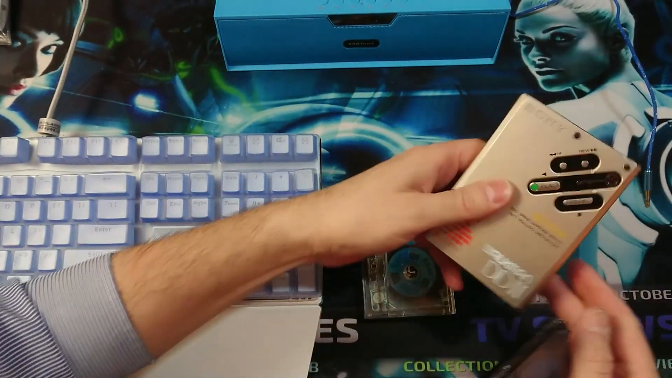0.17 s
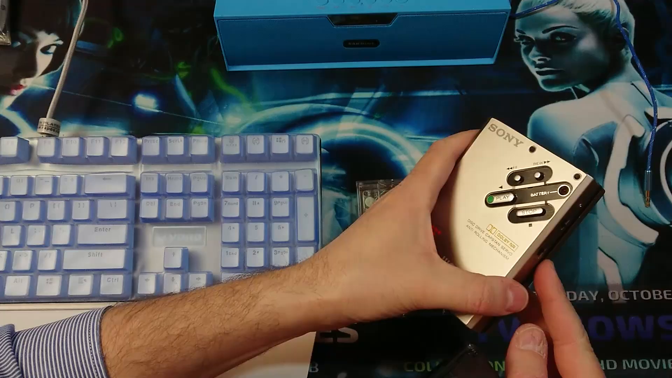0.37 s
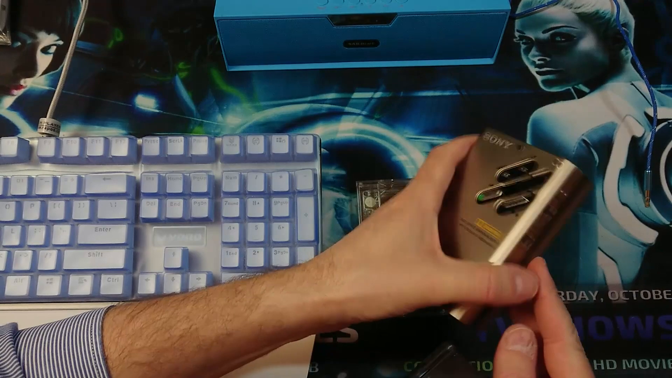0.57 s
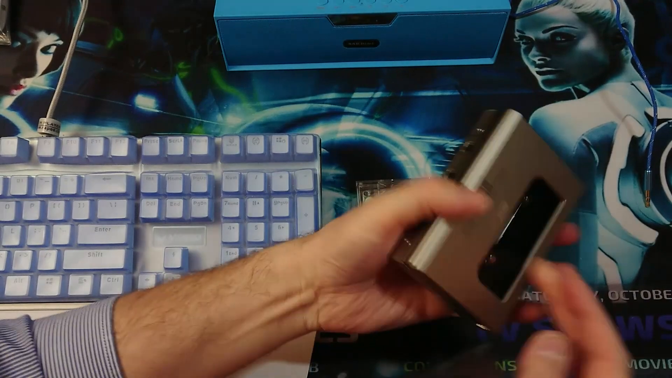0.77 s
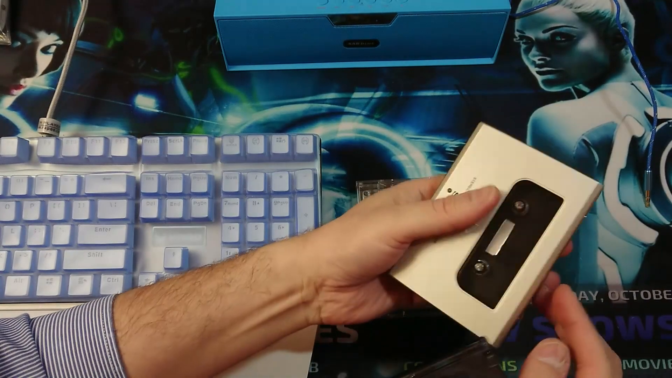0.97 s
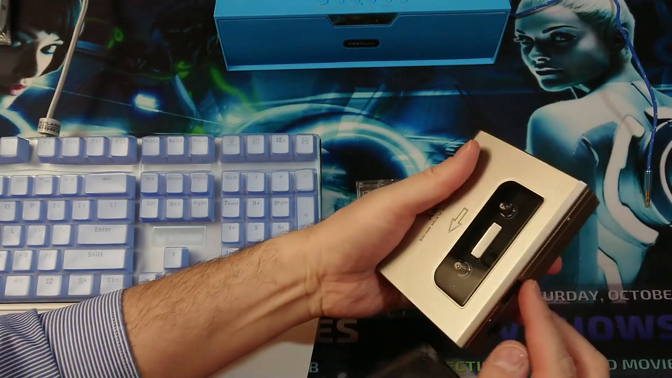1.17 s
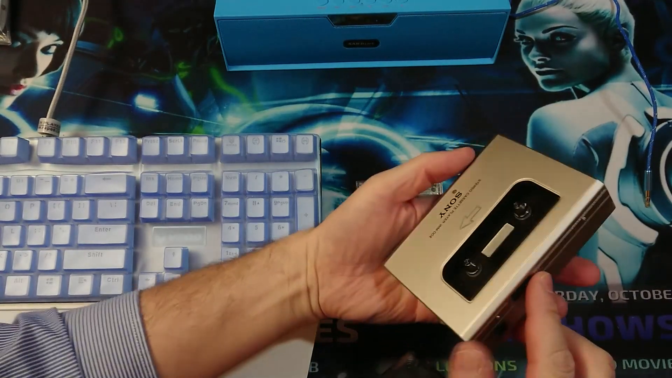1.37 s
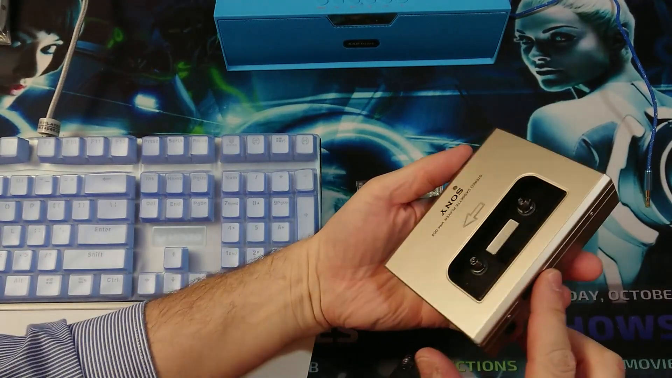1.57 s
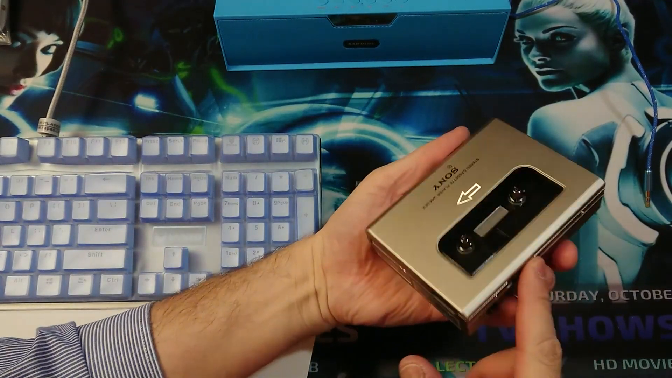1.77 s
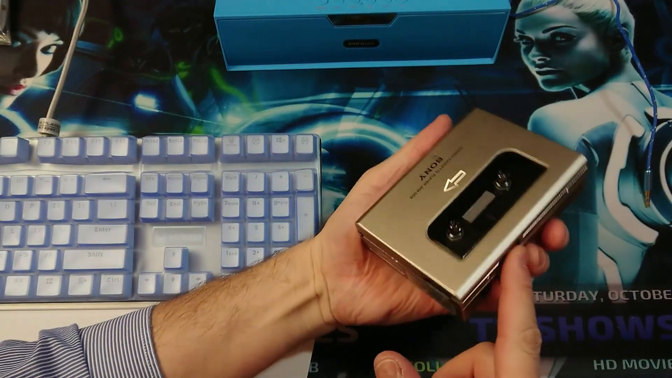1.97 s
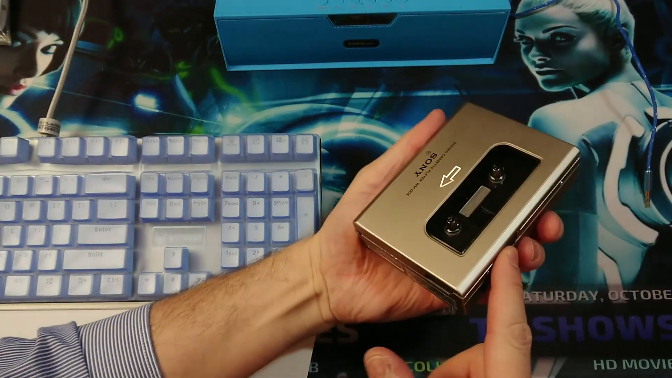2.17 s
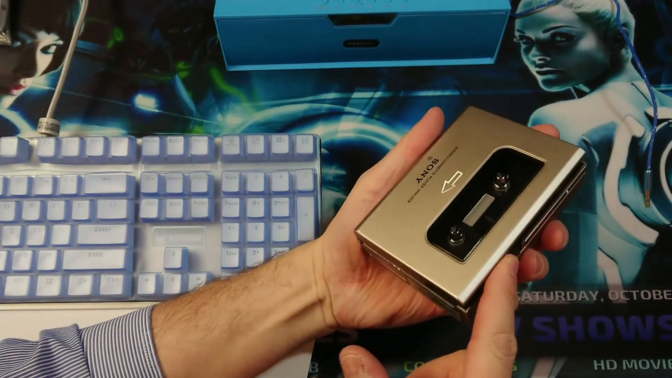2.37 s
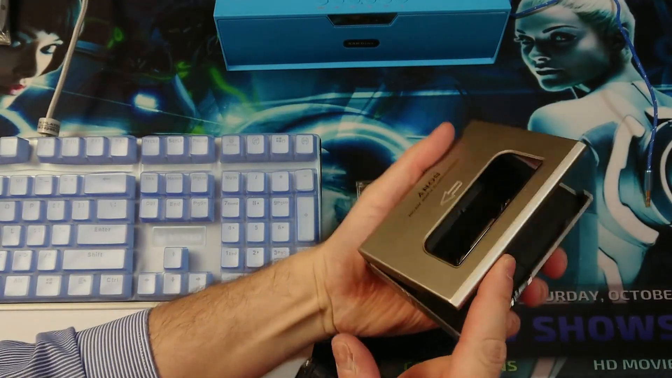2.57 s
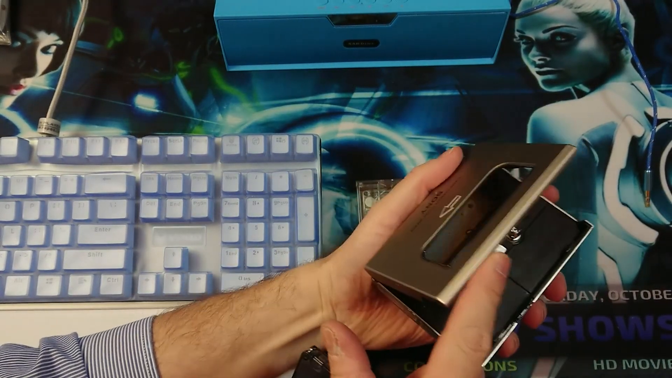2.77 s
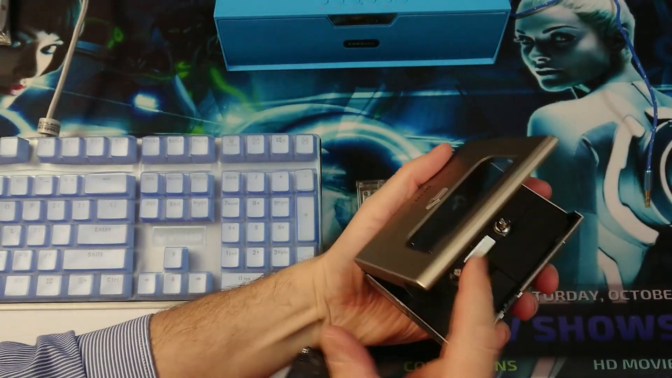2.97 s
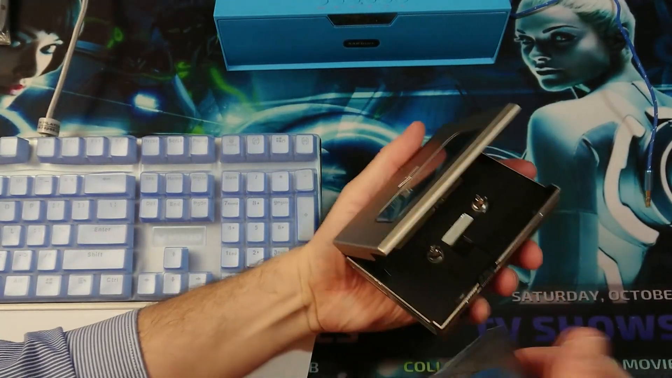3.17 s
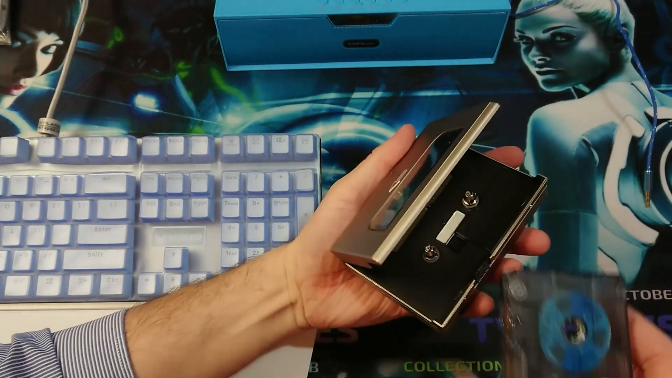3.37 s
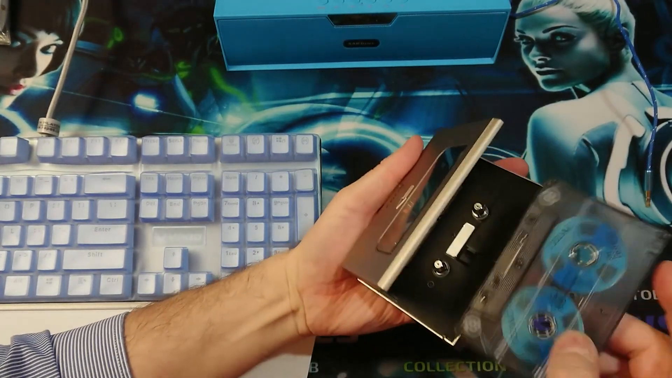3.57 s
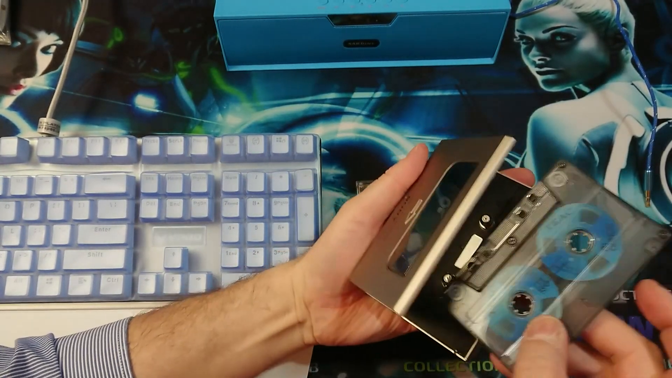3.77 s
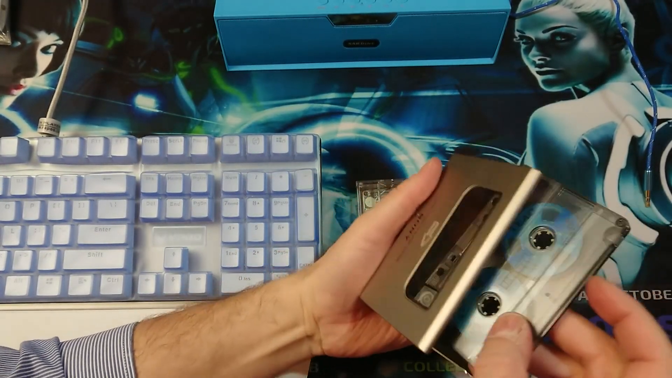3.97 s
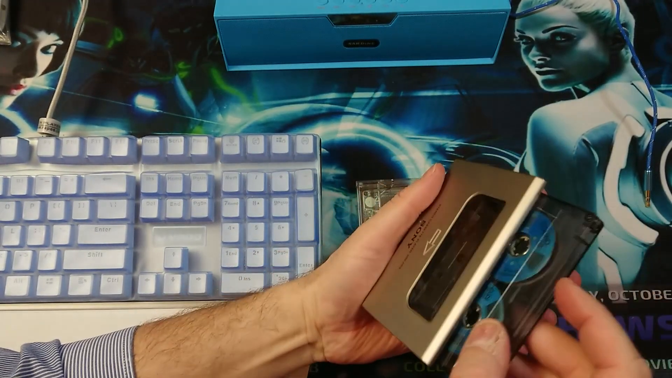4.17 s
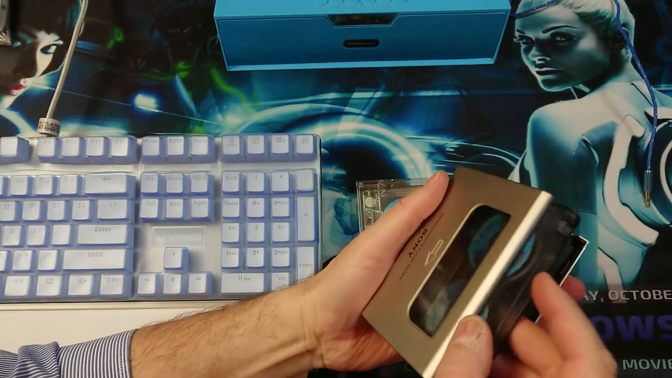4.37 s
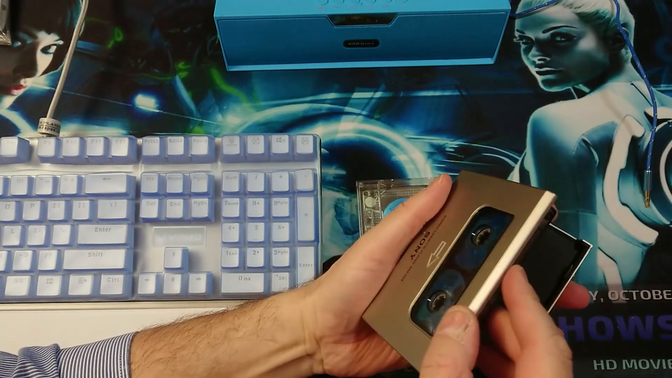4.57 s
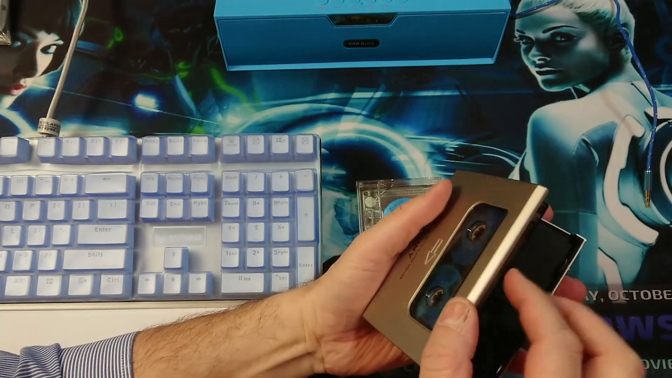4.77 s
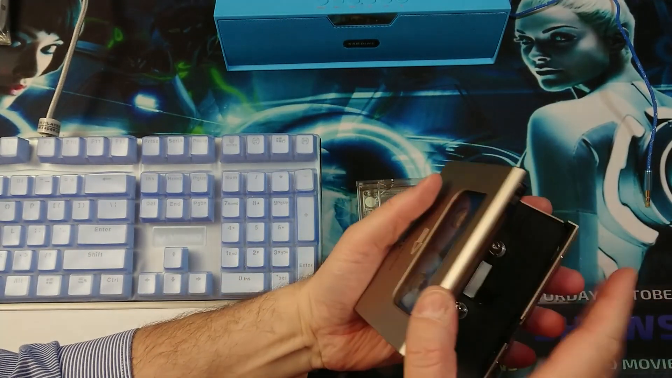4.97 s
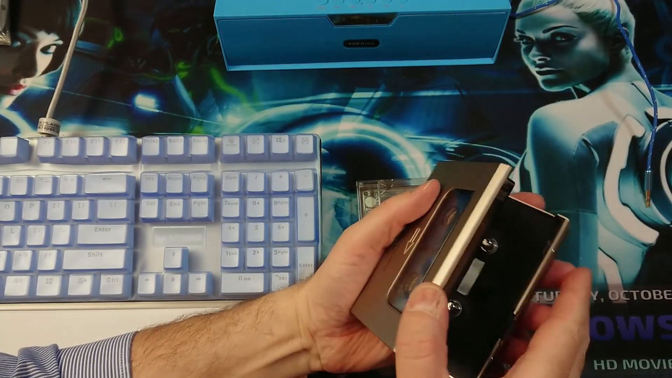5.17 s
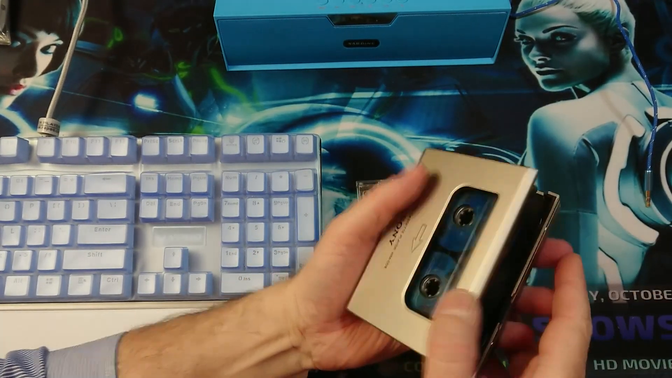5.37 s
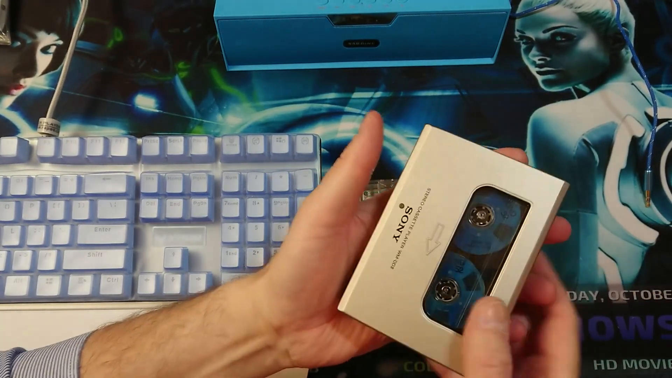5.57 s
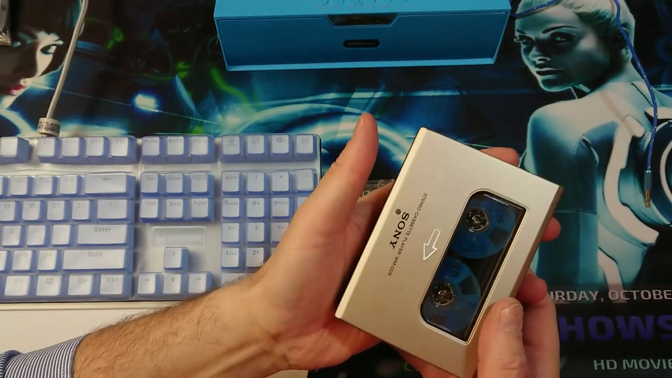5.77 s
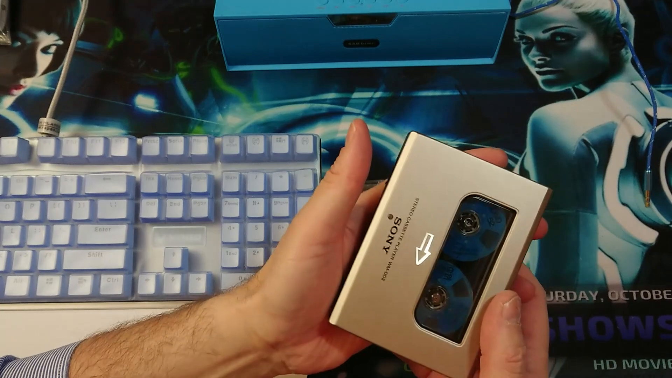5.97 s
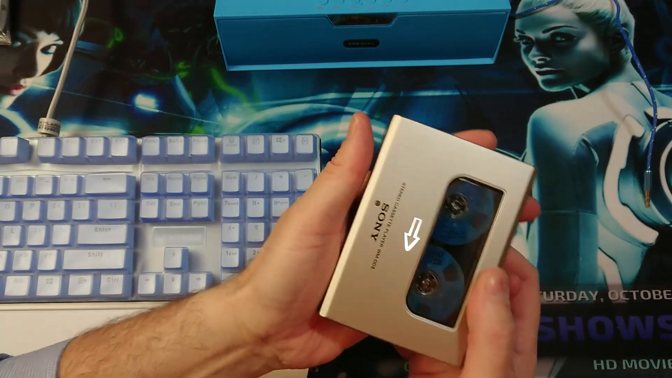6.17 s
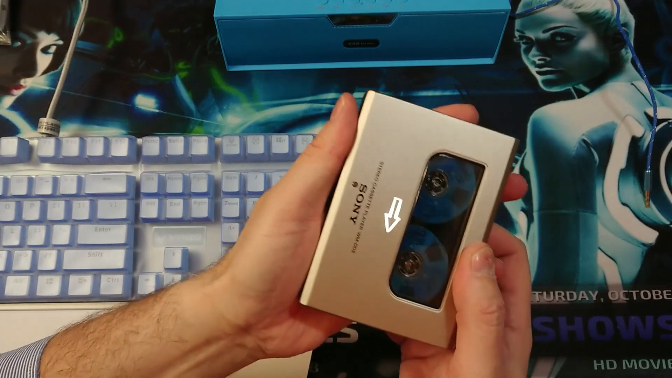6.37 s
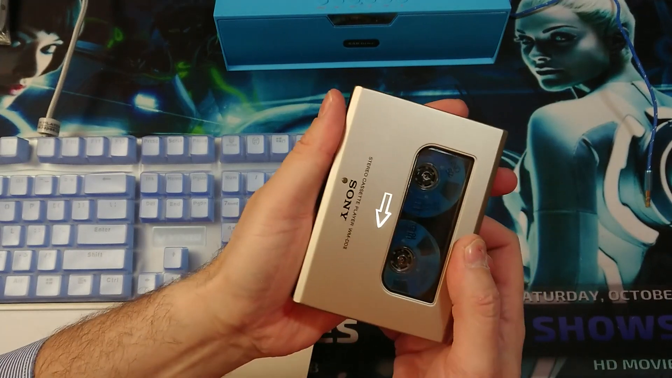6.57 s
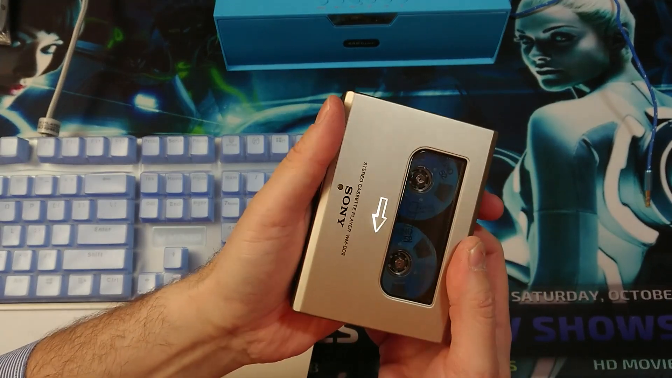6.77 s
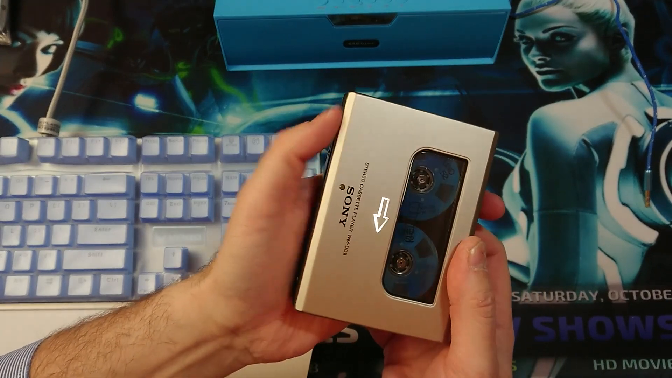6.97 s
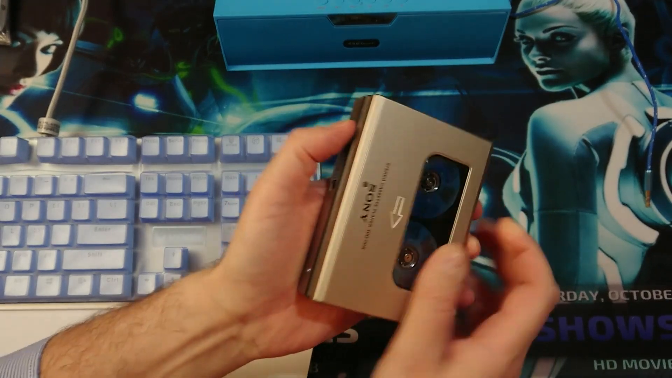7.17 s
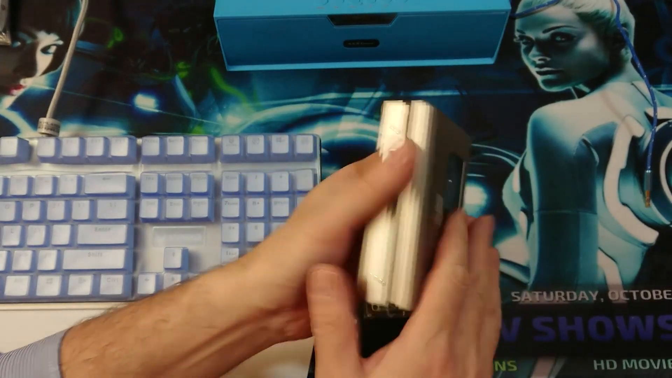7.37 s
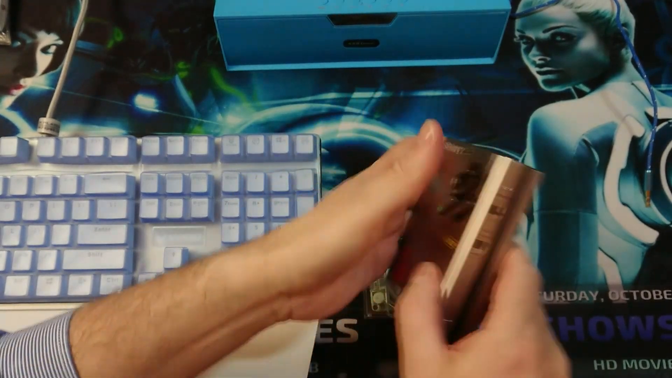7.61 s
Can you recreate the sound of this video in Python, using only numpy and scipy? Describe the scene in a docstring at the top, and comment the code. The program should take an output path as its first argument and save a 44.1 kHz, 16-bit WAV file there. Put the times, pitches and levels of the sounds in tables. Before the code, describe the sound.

Close-up handling at a desk in a small, dry room: soft gritty skin scuffs, quiet taps, a loud latch pop, a busy rattle of plastic as a tape slides in and seats with a crack, a sharp door snap, then a single solid clack and faint finger rubbing. Low fan rumble, light hiss and thin electronic whines lie underneath, slightly stronger on the left.

```python
"""A portable cassette player is handled over a desk: its door pops, a cassette slides in, the door snaps shut.
Each contact is a few milliseconds of uneven random blows, coloured by the shell's ringing tones.
Shaped noise makes the rubbing of skin, cassette and sleeve; low decaying swings add thuds to some heavy blows.
A small damped room answers with fading noise, over computer rumble, hiss and thin whines, in stereo."""
import sys
import numpy as np
from scipy import signal
from scipy.fft import rfft, irfft
from scipy.io import wavfile
from scipy.ndimage import uniform_filter1d

SR = 44100
rng = np.random.default_rng(int(sys.argv[2]) if len(sys.argv) > 2 else 0)


def transcribe(u):
    """Save the signal u as a 16-bit wav file named by the first command-line argument.

    u: samples, shape (n,) or (channels, n), limited to [-1, 1]; the rate is SR.
    q: integer samples, one column per channel.
    """
    v = np.clip(np.atleast_2d(u).T, -1, 1)
    q = np.round(v * 32767).astype(np.int16)
    wavfile.write(sys.argv[1], SR, q)


N = 336924  # length in samples
T = np.arange(N) / SR  # time in s


def undb(db):
    """Turn decibels into a gain."""
    return 10 ** (np.asarray(db) / 20)


def unit(x):
    """Scale a sound to an average (RMS) level of 1."""
    return x / np.sqrt(np.mean(x ** 2))


def across(hz, table):
    """Read (f/Hz, value) rows on a log-frequency axis."""
    rows = np.array(table)
    return np.interp(np.log(hz), np.log(rows[:, 0]), rows[:, 1])


def colour(x, gain):
    """Filter a sound by a function from Hz to gain."""
    size = x.shape[-1]
    f = np.maximum(np.fft.rfftfreq(size, 1 / SR), 1)
    return irfft(rfft(x) * gain(f), size)


def curve(rows, column):
    """Gain over time from a dB column, silent outside the rows."""
    rows = np.array(rows)
    edge_s = np.minimum(T - rows[0, 0], rows[-1, 0] - T)
    # 10 ms fades at the ends, but none at the very start or end of the scene
    fade = np.clip(edge_s * 100 + (T < .01) + (T > T[-1] - .01), 0, 1)
    return undb(np.interp(T, rows[:, 0], rows[:, column])) * fade


def walk(rate):
    """Random levels held for 1 / rate seconds, then smoothed twice into a wandering line."""
    k = int(SR / rate)
    held = np.repeat(rng.standard_normal(N // k + 1), k)
    smooth = uniform_filter1d(uniform_filter1d(held, k), k)
    return 1.3 * smooth[:N]


def pair(left_db):
    """Left and right gains, with the left louder by left_db."""
    return undb(np.array([[left_db], [-left_db]]) / 2)


# Tone balance of the background noise before its layers are levelled: (f/Hz, level/dB)
NOISE_BALANCE = [(15, -58.5), (25, -34), (41, -5), (87, 1), (124, -5), (430, -14.5), (534, -23.5),
                 (869, -13.5), (1170, -19.5), (1960, -20), (3190, -25), (6630, -31.5), (7190, -27),
                 (8460, -27), (16200, -32)]
# How alike left and right are, before limiting to 0...0.99: (f/Hz, likeness [1 = same])
LIKENESS = [(60, 0.82), (130, 0.36), (290, 0.26), (640, 0.26), (1410, 0.1), (3100, 0.1), (6820, -0.02),
            (15000, 0.04)]
# Thin whines of electronics on the desk, before they waver: (f/Hz, level/dB against the hiss)
WHINES = [(5749, -20), (6998, -17), (7402, -17), (10401, -22), (15299, -25)]
# Background levels over time: (t/s, deep rumble level/dB, fan rumble level/dB, hiss level/dB)
BACKGROUND_LEVELS = [(0, -74, -72.5, -70.5), (.425, -93, -81, -70.5), (.435, -66.5, -64.5, -74),
                     (.9, -71.5, -65, -62.5), (1.1, -79.5, -66, -65.5), (6.795, -75.5, -67.5, -68),
                     (6.805, -95.5, -80, -81.5), (7.64, -83.5, -78, -71.5)]


def background():
    """Noise split by pitch into deep rumble, wavering fan rumble and hiss, plus sine-wave whines."""
    like = lambda f: np.clip(across(f, LIKENESS), 0, .99)
    mid = colour(rng.standard_normal(N), lambda f: np.sqrt(1 + like(f)))
    side = colour(rng.standard_normal(N), lambda f: np.sqrt(1 - like(f)))
    stereo = mid + np.array([[1], [-1]]) * side
    noise = colour(stereo, lambda f: undb(across(f, NOISE_BALANCE)))
    low = colour(noise, lambda f: 1 / (1 + (f / 420) ** 4))
    deep = colour(low, lambda f: 1 / (1 + (f / 66) ** 8))
    fan = unit(low - deep) * undb(1.7 * walk(6.5))
    whines = 0
    for k, (hz, db) in enumerate(WHINES):
        phase = np.array([[0], [k]])  # sets how far apart left and right start
        whines = whines + undb(db + 1.5 * walk(15)) * np.sin(2 * np.pi * hz * T + phase)
    layers = unit(deep), fan, unit(noise - low) + whines
    return sum(x * curve(BACKGROUND_LEVELS, k + 1) for k, x in enumerate(layers)) * pair(-4.5)


STROKE_RISE_S, STROKE_FALL_S = 0.06, 0.023


def stroke(start, length, db):
    """Gain of one rub: it rises towards db, then dies away after its length, even if still rising."""
    t = T - start
    rise = np.clip(t / STROKE_RISE_S + (start == 0), 0, 1)  # a rub at time 0 is already under way
    return undb(db) * rise * np.exp(-np.maximum(t - length, 0) / STROKE_FALL_S)


# Tone balance of rubbing skin, before levelling and the cut below 1400 Hz: (f/Hz, level/dB)
SKIN_BALANCE = [(880, -36.5), (1500, 0), (3130, 1), (5750, -5), (6880, -1), (11400, -9.5), (15100, -6),
                (16200, -7)]
# The hollow of the shell: (f/Hz, distance to half gain/Hz)
SKIN_HOLLOW = (1148, 170)
# Fingers shifting their grip, levels aimed for:
# (t/s, length/s, scuff level/dB, hollow body level/dB, fine hiss level/dB)
GRIP_SHIFTS = [(0, 0.021, -50.5, -58.5, -52.5), (0.237, 0.048, -63.5, -70, -64.5),
               (0.333, 0.068, -69, -68, -58.5), (1.678, 0.18, -63.5, -61.5, -60),
               (1.883, 0.24, -75, -68.5, -69), (2.055, 0.02, -52, -43.5, -53),
               (2.518, 0.062, -61, -55.5, -62), (2.59, 0.18, -78, -63.5, -80),
               (3.363, 0.1, -58, -69, -62.5), (3.46, .07, -57, -71, -59), (5.287, .09, -70.5, -68, -76),
               (5.521, 0.042, -57.5, -58.5, -62), (7.029, 0.1, -79.5, -94.5, -71),
               (7.18, 0.07, -71.5, -80, -70), (7.313, 0.098, -77.5, -91, -76),
               (7.461, 0.042, -62.5, -66, -53.5), (7.566, 0.058, -69, -66.5, -59.5)]
# One long slide of the hand while the player is turned over: (t/s, scuff level/dB, hollow body level/dB)
TURN_OVER = [(.58, -102, -84), (.622, -70.5, -64.5), (.712, -60.5, -63), (.882, -63, -64),
             (.922, -50.5, -43.5), (.946, -52.5, -61), (1.104, -52, -59), (1.15, -65, -63.5),
             (1.188, -52, -60), (1.236, -59, -47), (1.318, -74.5, -67), (1.382, -60, -70),
             (1.44, -88, -66.5), (1.5, -84, -90)]
TURN_HISS_DB = 7.5  # fine hiss against the scuff
SCUFF_TOP_HZ = 4660


def skin():
    """Slip-stick rubbing as fluttering noise; the hollow shell lifts one band."""
    hz, width = SKIN_HOLLOW
    grain = undb(1.8 * walk(45) + 1.2 * walk(300))
    rough = rng.standard_normal((2, N)) * grain
    noise = colour(rough, lambda f: undb(across(f, SKIN_BALANCE)) * (f > 1400))
    scuff = colour(noise, lambda f: 1 / (1 + (f / SCUFF_TOP_HZ) ** 4))
    push = rng.standard_normal(N) + 0.36 * rng.standard_normal((2, N))  # mostly shared by both sides
    body = colour(push * undb(3.2 * walk(30)), lambda f: 1 / (1 + ((f - hz) / width) ** 2))
    layers = scuff, body, noise - scuff
    turn_scuff = curve(TURN_OVER, column=1)
    turn = turn_scuff, curve(TURN_OVER, column=2), turn_scuff * undb(TURN_HISS_DB)
    total = 0
    for k, layer in enumerate(layers):
        grip = sum(stroke(*row[:2], row[k + 2]) for row in GRIP_SHIFTS)
        total = total + unit(layer) * (turn[k] + grip)
    return total * pair(-3.5)


# How long the room takes to fade by 60 dB: (f/Hz, fade time/s)
ROOM_FADE = [(150, 0.64), (500, 0.37), (1500, 0.24), (5000, 0.37), (12000, 0.24)]
ROOM_DB, ROOM_GAP_S = -4.5, 0.0012  # strength of the echo, silence before it


def room(dry):
    """Dense echoes as fading noise, octave by octave, less alike left and right towards the treble."""
    t = np.arange(SR // 2) / SR
    tail = 0
    for hz in 125 * 2. ** np.arange(8):
        shared = min(900 / hz, 1.5) * rng.standard_normal(len(t))
        noise = rng.standard_normal((2, len(t))) + shared
        octave = lambda f: np.cos(np.pi / 2 * np.clip(np.log2(f / hz), -1, 1))
        band = colour(noise / noise.std(), octave)
        tail = tail + band * np.exp(-np.log(1000) * t / across(hz, ROOM_FADE))
    tail = tail * np.clip((t - ROOM_GAP_S) / 0.0013, 0, 1)
    tail = tail / np.sqrt((tail ** 2).sum(1, keepdims=True))
    return undb(ROOM_DB) * signal.fftconvolve(dry, tail, axes=1)[:, :N]


# Ringing tones (modes) of the plastic shell, before small random shifts of pitch and level:
# (f/Hz, level/dB, time to fade by 60 dB/s)
SHELL_MODES = [(602.6, 5, 0.043), (870, -4.5, 0.031), (1106, -1.5, 0.025), (1305, 0.5, 0.015),
               (1590, 0.5, 0.058), (1974, -2, 0.014), (2220, 0.5, 0.019), (2450, -4.5, 0.019),
               (2760, -5.5, .03), (3040, -4, 0.0066), (3680, -1.5, 0.17), (4154, -6, 0.022),
               (5210, 0, 0.055), (7020, -2, .015)]
RADIATES_HZ = 481  # a small shell moves ever less air below this


def contact(low_db, high_db, strong_hz, rattle_ms, strong_db, crack_db=-6.0):
    """Uneven blows make the shell ring; returns the stereo sound and its plain response for the room."""
    size = 4096
    f = np.maximum(np.fft.rfftfreq(size, 1 / SR), 1)
    hz, db, t60 = np.transpose(SHELL_MODES)
    chance = rng.standard_normal((2, len(hz)))
    hz = (hz * (1 + .015 * chance[0]))[:, None]
    width = np.log(1000) / np.pi / t60[:, None]  # a quick fade means a broad resonance
    resonance = 1j * f * width / (hz ** 2 - f ** 2 + 1j * f * width)
    modes = undb(db + 4 * chance[1])[:, None] * resonance
    tilt_db = across(f, [(400, low_db - 5.0), (680, low_db), (1050, 4.2), (4000, -1.2), (5500, high_db),
                         (9500, high_db - 1.0), (11500, high_db - 10.0), (15000, high_db - 5.5)])
    # the spot that is struck favours one region
    tilt_db = tilt_db + strong_db * np.exp(-(np.log2(f / strong_hz) / .24) ** 2)
    radiates = (1j * f / (RADIATES_HZ + 1j * f)) ** 3
    # an even crack fills in between the modes
    ringing = np.sqrt(undb(2 * crack_db) + (np.abs(modes) ** 2).sum(0))
    body = ringing * undb(tilt_db) * np.abs(radiates)
    # make the response start at the blow, using the cepstrum of the log gain
    cepstrum = irfft(np.log(body + 1e-9), size)
    fold = np.r_[1, np.full(size // 2 - 1, 2), 1, np.zeros(size // 2 - 1)]
    body = np.exp(rfft(cepstrum * fold))
    u = np.arange(size) / SR * 1000 / np.clip(rattle_ms, .3, 14)  # time in rattle lengths
    shape = np.minimum(u * 2.5, 1) * np.exp(-u ** 2)
    noise = rng.standard_normal((3, size))
    blows = noise[:2] * (.5 + np.abs(noise[2])) * shape
    mid, side = rfft(blows)
    # the blow reaches the two sides at different angles: the higher, the less alike
    spread = np.array([[1], [-1]]) * np.minimum(f / 3800, .95) * side
    near = irfft(body * (mid + spread), size)
    # the loudest 2 ms (88 samples) average half of full scale
    near = near / np.sqrt(uniform_filter1d((near ** 2).mean(0), size=88).max()) / 2
    even = irfft(body, size)
    return near, even * np.sqrt((near ** 2).mean() / (even ** 2).mean())


# Contacts; level sets the loudest 2 ms, where 0 dB is half of full scale before stereo balance:
# (t/s, level/dB, low modes level/dB, high modes level/dB, strongest region f/Hz, lift there level/dB)
CONTACTS = [(0.072, -29, -7, 5, 2500, 5), (0.795, -42, -18, 1, 3800, 6), (0.923, -39, -5, 2, 1180, 6),
            (1.016, -30.5, 3, 9, 3180, 14), (1.293, -41, -7, -15, 1160, 12),
            (2.057, -32.5, -9, -7, 1140, 21), (2.064, -32, 5, -2, 1150, 14), (2.103, -47, -1, -6, 1110, 5),
            (2.407, -28, -4.5, 3.5, 1180, 10), (2.42, -33.5, 0.5, -8, 1222, 3.5),
            (2.43, -30.5, 1.5, -5, 1322, 7), (2.456, -23.5, 0, -9.5, 603, 10.5),
            (2.556, -40.5, -3, -5.5, 2613, 7), (2.673, -53.5, 2, -11, 964, 9.5),
            (2.742, -13.5, -2.5, -7.5, 6800, 4), (2.748, -2.5, -9.5, -5, 2360, 3.5),
            (2.955, -39.5, 2, -14, 2670, 6), (3.003, -49, 1, -15, 1210, 16),
            (3.028, -35, 9.5, -2.5, 7080, 15.5), (3.171, -52, 4, -23, 2200, 4),
            (3.256, -35.5, -14, -10.5, 2430, 1), (3.299, -34.5, -9.5, 5, 2840, 6.5),
            (3.401, -45, -10, -13.5, 2250, 10), (3.434, -37.5, -12, -4, 2350, 11),
            (3.515, -39, -4.5, 0, 1960, 7), (3.789, -46.5, 1, -6.5, 2700, 7.5),
            (4.034, -15, 2.5, 1, 1116, 7.5), (4.047, -21.5, -6, -3.5, 7370, 0), (4.067, -17, 5, 0, 1830, 3),
            (4.105, -26, 3.5, -12.5, 1083, 5.5), (4.112, -27.5, 5, -10, 1284, 7),
            (4.156, -29.5, 4, -2, 1228, 4.5), (4.229, -31.5, 11, -0.5, 1117, 5.5),
            (4.259, -3.5, 3, -1, 4183, 7.5), (4.324, -21.5, 4.5, -8, 1262, 6),
            (4.365, -16, 6, -13, 1335, 5.5), (4.392, -21.5, 5.5, -7, 1130, 5.5),
            (4.412, -30, 2, -2.5, 3650, 7.5), (4.431, -12.5, 8, -7, 1220, 8.5),
            (4.445, -12.5, 4.5, -10, 1220, 4.5), (4.454, -6.5, 1.5, -4.5, 2350, 3),
            (4.467, -10.5, 1, -8, 1300, 2), (4.488, -21, 1.5, -1, 2170, 4.5),
            (4.577, -26, -3, -7, 1529, 4.5), (4.602, -20.5, -1.5, -8, 2260, 4.5),
            (4.615, 0.5, -6.5, -2, 2900, 2.5), (5.579, -29, -9, 3, 2090, 7),
            (5.591, -13.5, -7, 2, 1202, 8.5), (5.596, -3, -3.5, -1.5, 2220, 8),
            (5.6, -5, -5, -5.5, 2082, 2), (5.606, -8, 0, 11, 2464, 3.5), (5.903, -43, 2.5, -19.5, 1280, 9),
            (6.075, -48, -4.5, -1.5, 5310, 10), (6.232, -19, 8.5, -6.5, 1729, 4),
            (6.236, -6.5, 8.5, 2, 3627, 4.5), (7.308, -44.5, -10, 8, 3380, 9),
            (7.369, -56.5, 2, -2, 1290, 1)]
HITS_LEFT_DB, HITS_SCATTER_DB = -3.5, 2  # left against right, and its random spread
RATTLE_MS, RATTLE_MS_PER_DB = 5.18, 0.08  # a light touch rattles on longer than a hard blow


def clicks():
    """Door latch, buttons, cassette and fingertips strike the shell, each as one short rattle."""
    near, spread = np.zeros((2, N + SR)), np.zeros(N + SR)
    for s, db, low_db, high_db, strong_hz, strong_db in CONTACTS:
        rattle_ms = RATTLE_MS - RATTLE_MS_PER_DB * db
        hit, even = contact(low_db, high_db, strong_hz, rattle_ms, strong_db)
        start = int(s * SR)
        at = slice(start, start + len(even))
        left_db = HITS_LEFT_DB + HITS_SCATTER_DB * rng.standard_normal()
        near[:, at] += hit * undb(db) * pair(left_db)
        spread[at] += even * undb(db)
    return near[:, :N], spread[:N]


# A sleeve drags over the desk mat, level before stereo balance: (t/s, length/s, level/dB)
SLEEVE_DRAG = (1.77, 0.38, -68)


def sleeve(hz=350, width=70):
    """Cloth rubbing on the mat gives a dull scuff: noise in one low band."""
    drag = rng.standard_normal(N) + .5 * rng.standard_normal((2, N))
    dull = colour(drag, lambda f: 1 / (1 + ((f - hz) / width) ** 2))
    return unit(dull) * stroke(*SLEEVE_DRAG) * pair(2.0)


# Cassette scraping along its guides, level before stereo balance: (t/s, level/dB)
SCRAPE = [(4.03, -49), (4.12, -44), (4.21, -56.5), (4.248, -36), (4.326, -47.5), (4.44, -35), (4.5, -31.5),
          (4.54, -31), (4.57, -33.5), (4.605, -26.5), (4.62, -37)]


def slide():
    """Dense tiny catches of plastic on plastic: fluttering noise coloured like the shell."""
    catches = rng.standard_normal(N) + 0.82 * rng.standard_normal((2, N))
    catches = catches * undb(2.5 * walk(90) + 2.5 * walk(900))
    shell = contact(2.5, -3, 2100, 0.37, 3.1)[1]
    scrape = signal.fftconvolve(catches, shell[None], axes=1)[:, :N]
    return unit(scrape) * curve(SCRAPE, 1) * pair(-1.5)


# Some heavy blows also jolt hands and desk, swing level before decay and bass cut: (t/s, level/dB)
JOLTS = [(4.258, -52), (4.615, -24.5), (5.601, -32.5), (6.236, -27.5)]


def thuds(hz=300, t60=0.013, floor_hz=110):
    """Hands and desk make one low swing, damped almost at once, with little deep bass."""
    out = 0
    for s, db in JOLTS:
        t = np.maximum(T - s, 0)
        out = out + undb(db) * np.sin(2 * np.pi * hz * t) * np.exp(-np.log(1000) * t / t60)
    return colour(out, lambda f: 1j * f / (floor_hz + 1j * f)) * pair(-5.5)


def scene():
    """Add the clicks, thuds and rubbing, the room's answer and the background."""
    near, spread = clicks()
    rubbing = skin() + slide() + sleeve()
    echoes = room(spread * pair(-2.5) + rubbing)
    return near + thuds() + rubbing + echoes + background()


def record(dry):
    """Flatten peaks beyond 0.98 of full scale, then cut sharply above 16 kHz."""
    cut = signal.ellip(10, .2, 70, 16000, fs=SR, output="sos")
    return signal.sosfilt(cut, np.clip(dry, -.98, .98))


dry = scene()
out = record(dry)
transcribe(out)
```